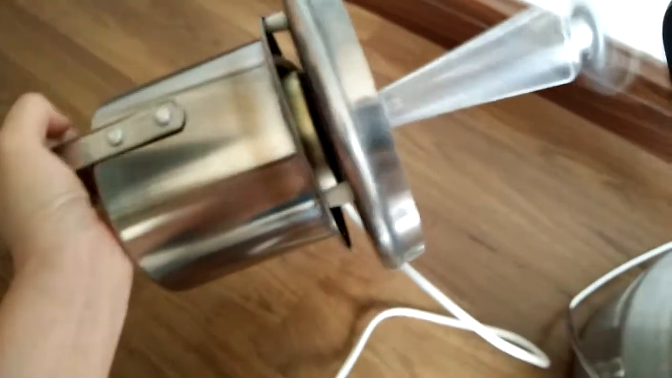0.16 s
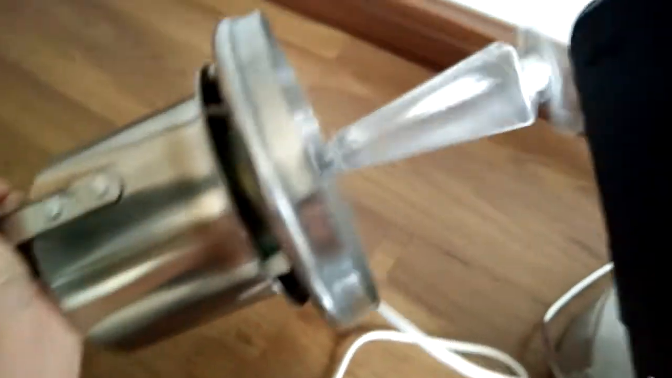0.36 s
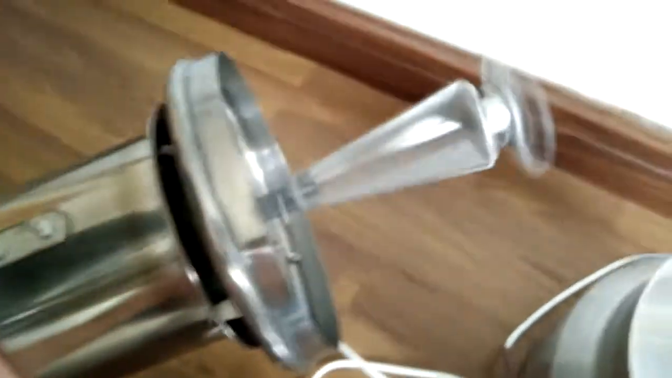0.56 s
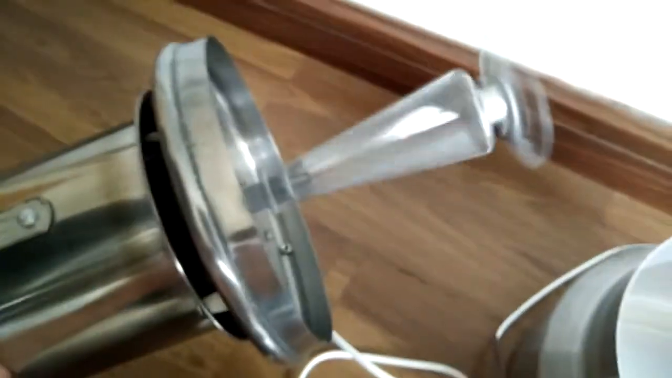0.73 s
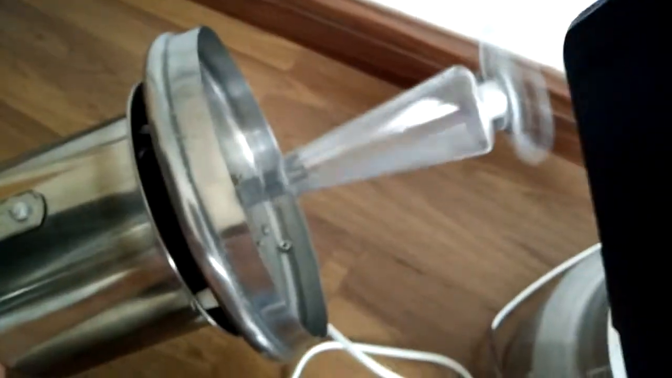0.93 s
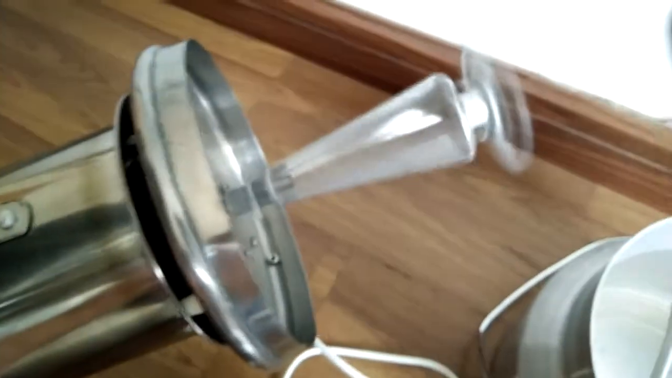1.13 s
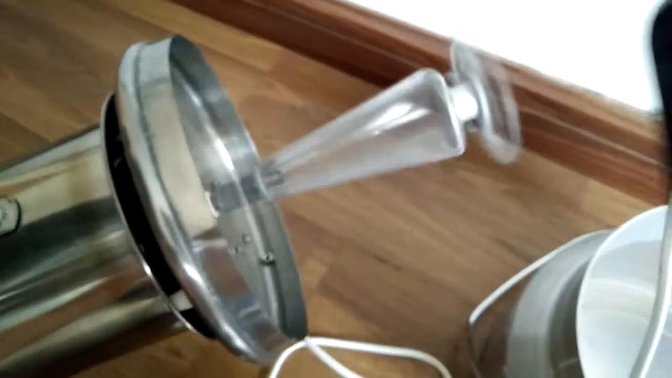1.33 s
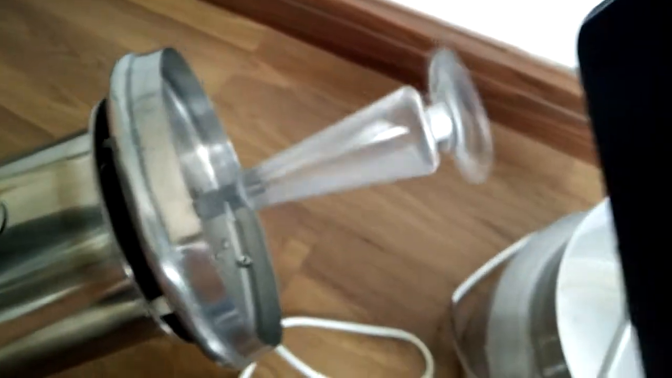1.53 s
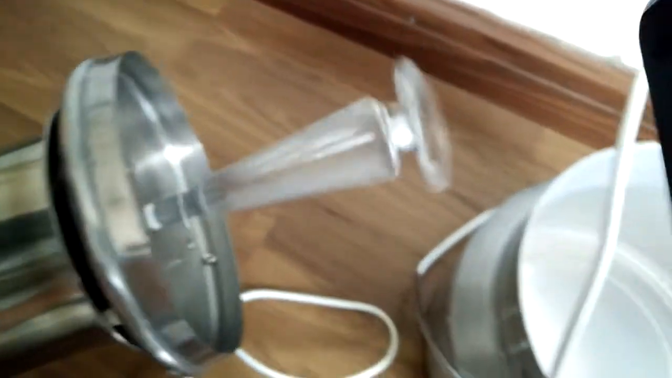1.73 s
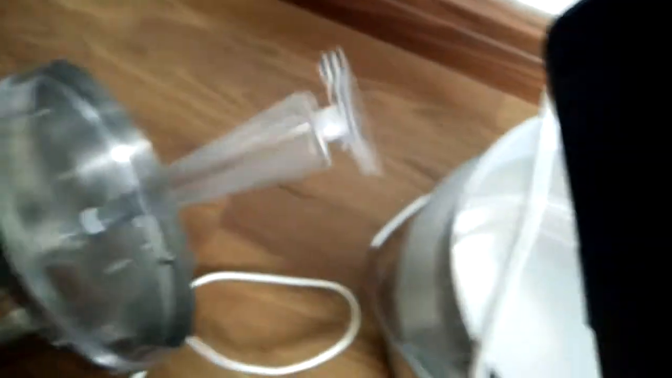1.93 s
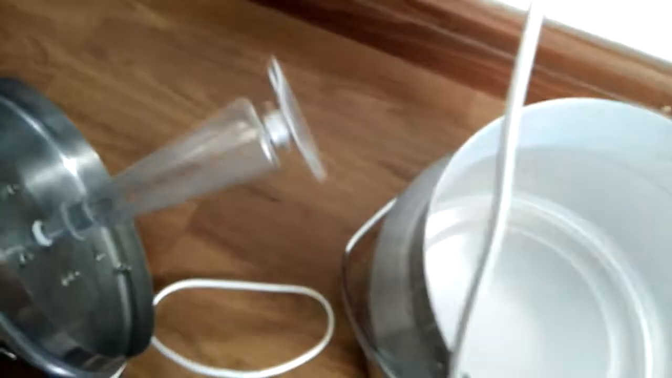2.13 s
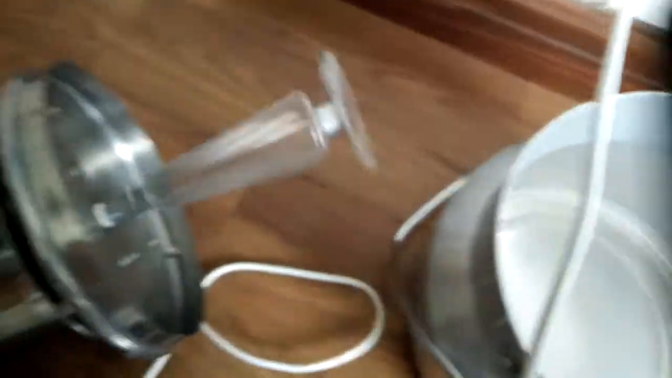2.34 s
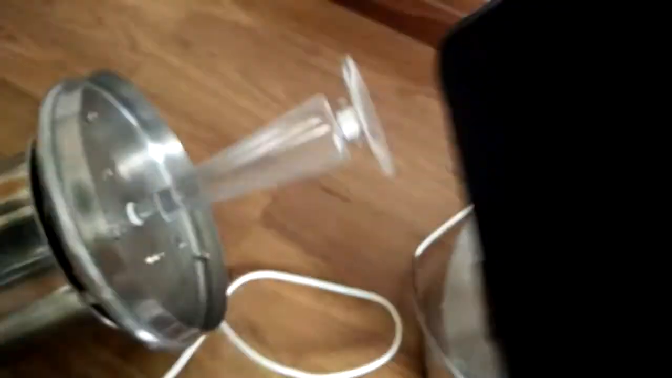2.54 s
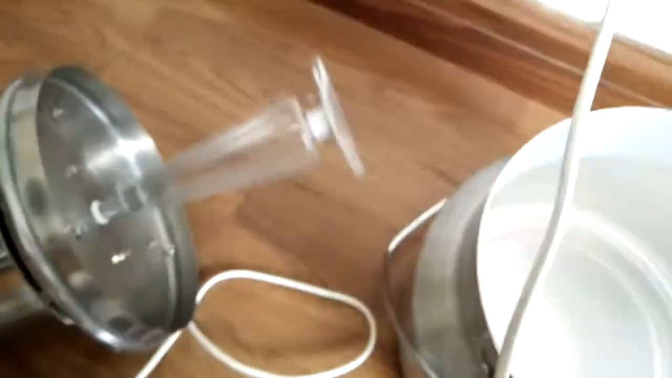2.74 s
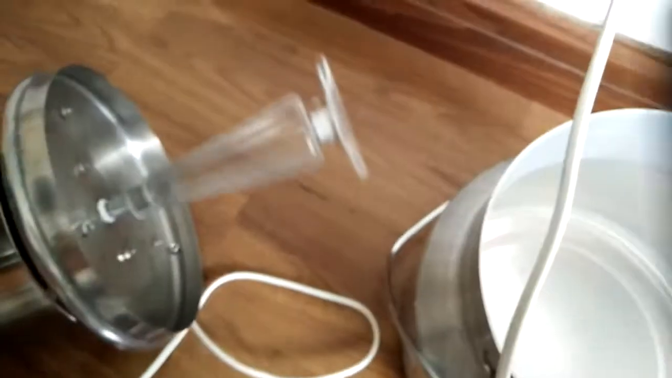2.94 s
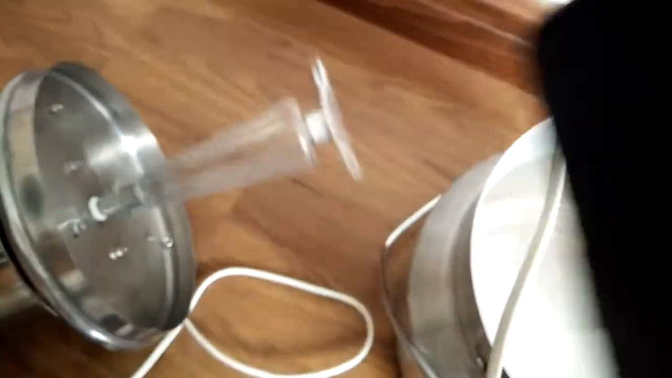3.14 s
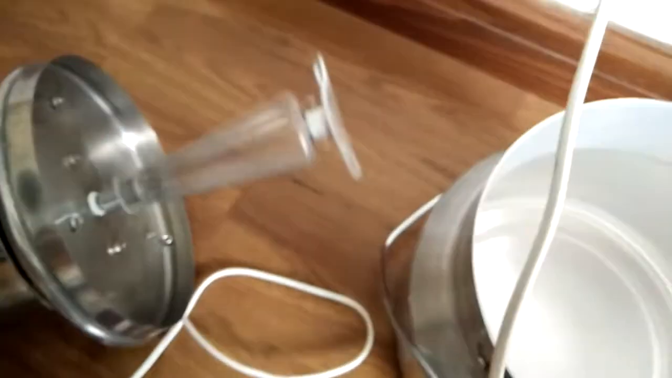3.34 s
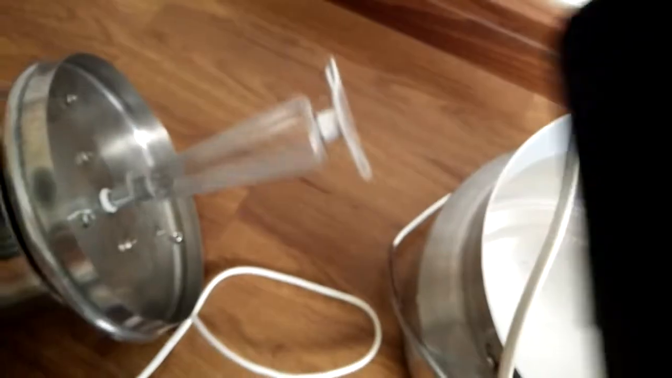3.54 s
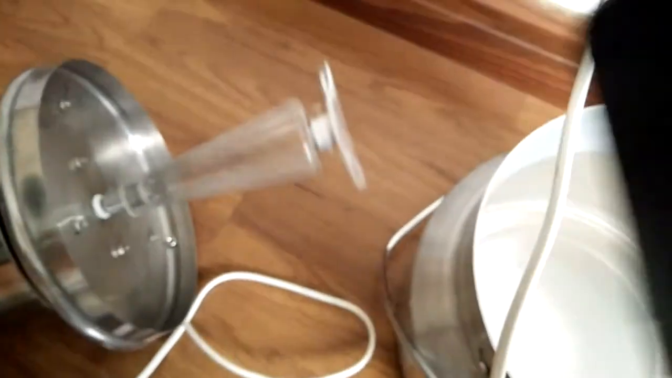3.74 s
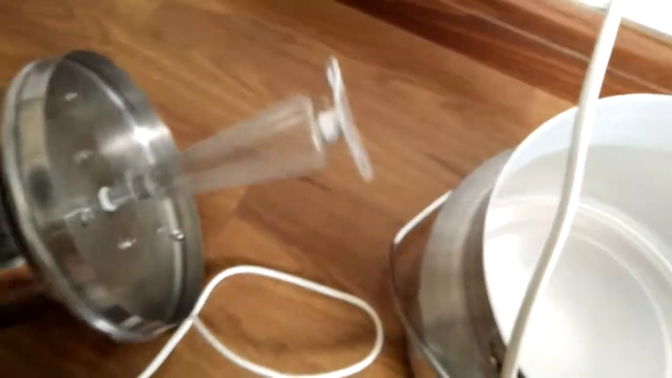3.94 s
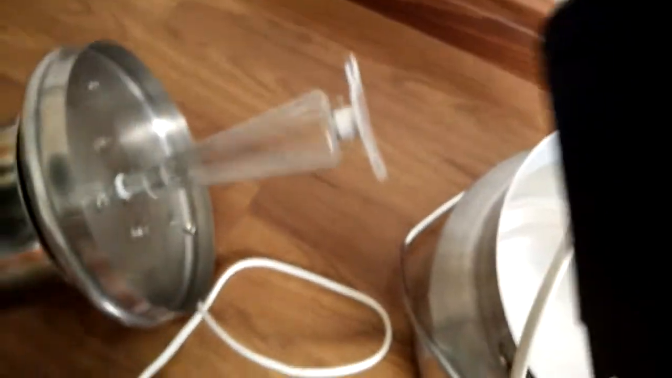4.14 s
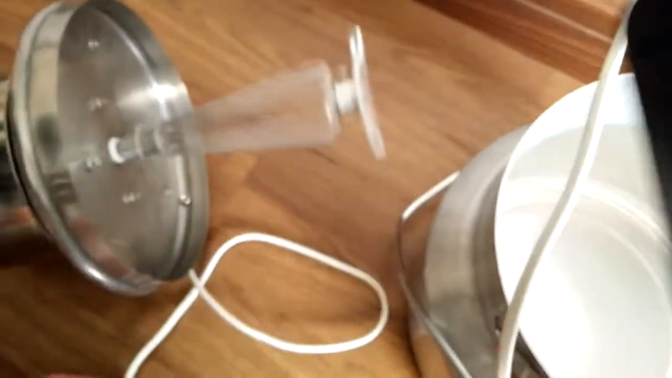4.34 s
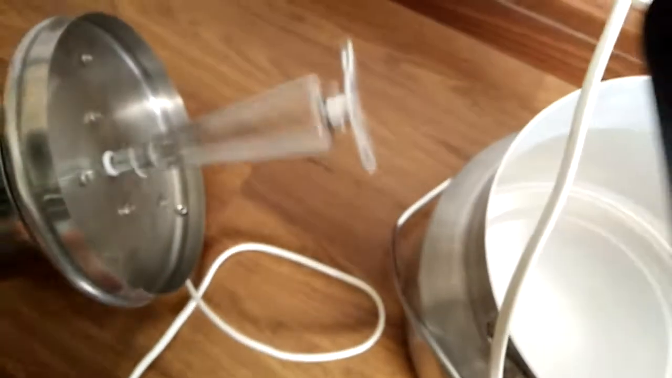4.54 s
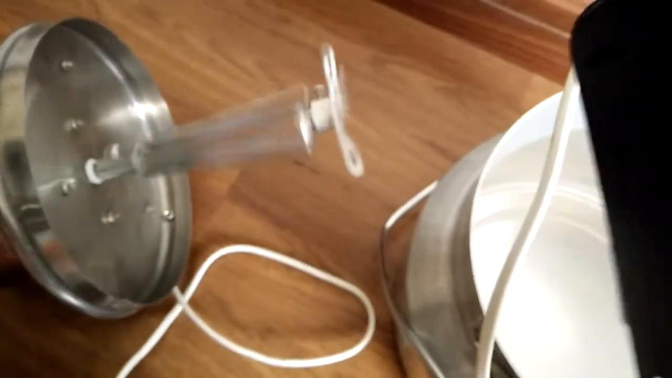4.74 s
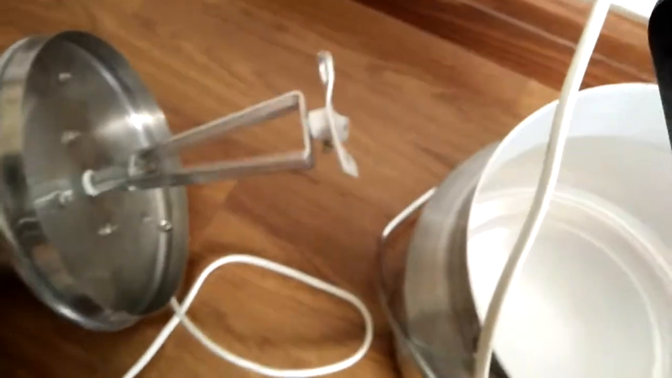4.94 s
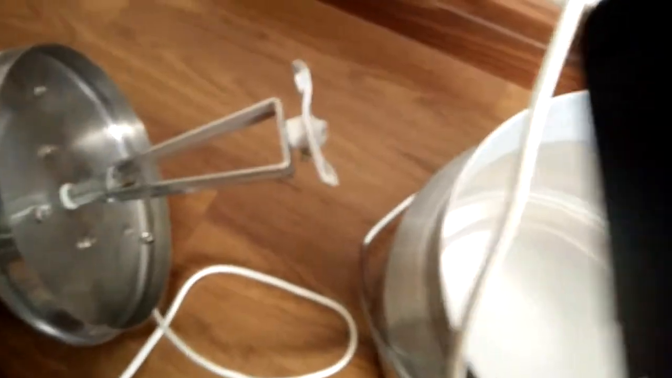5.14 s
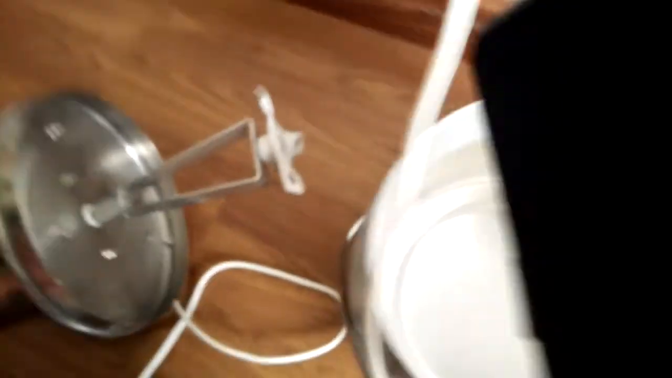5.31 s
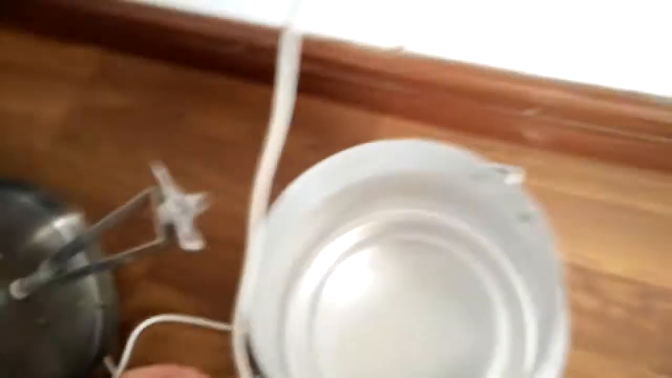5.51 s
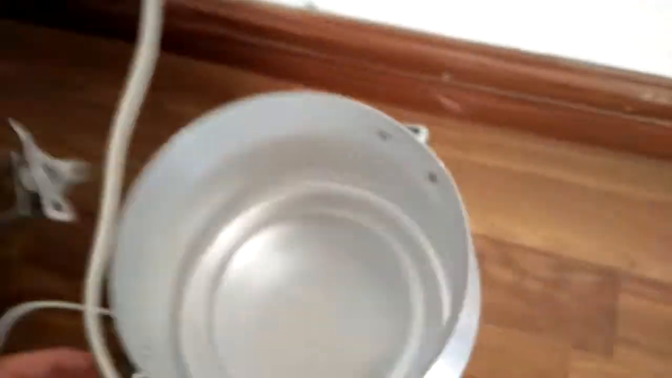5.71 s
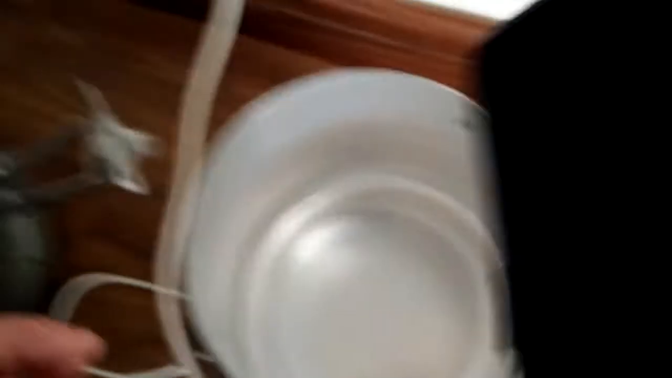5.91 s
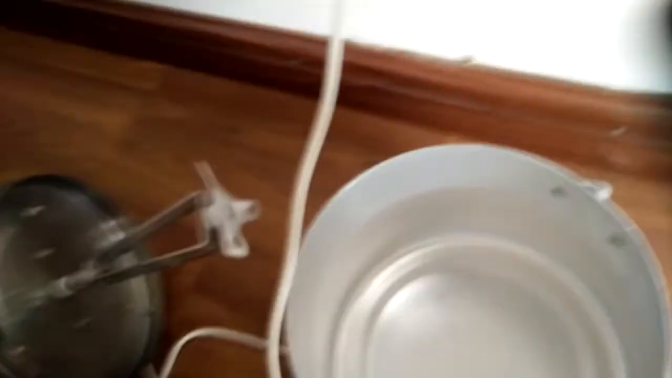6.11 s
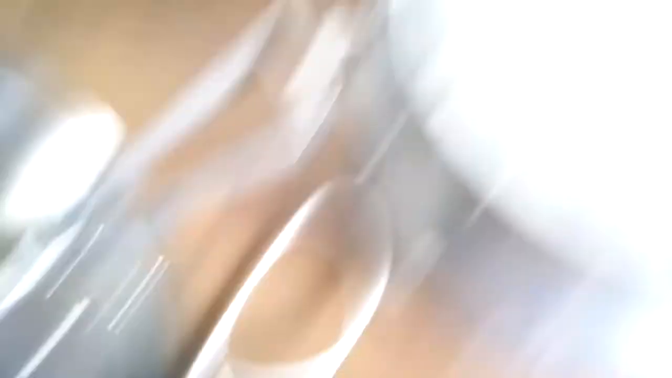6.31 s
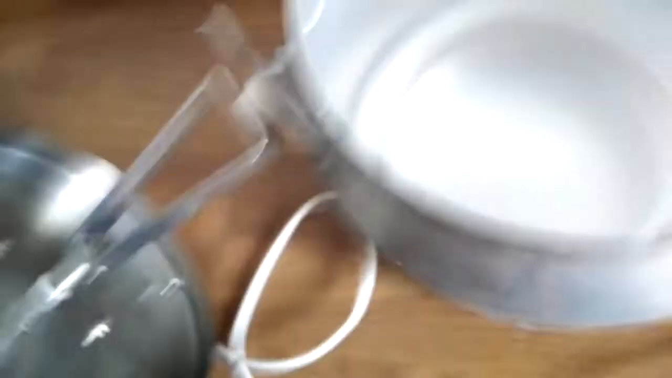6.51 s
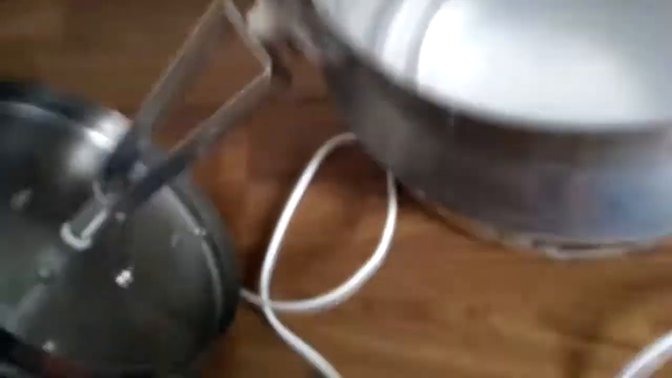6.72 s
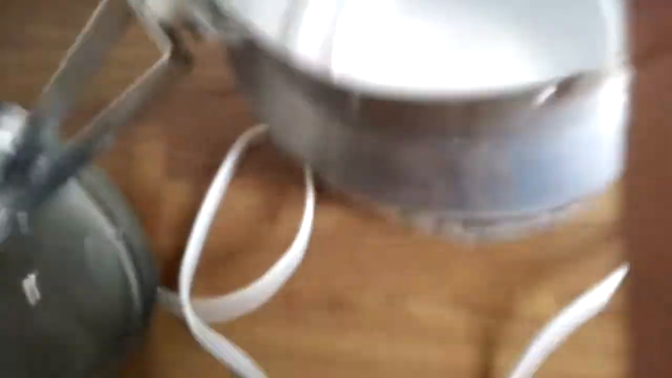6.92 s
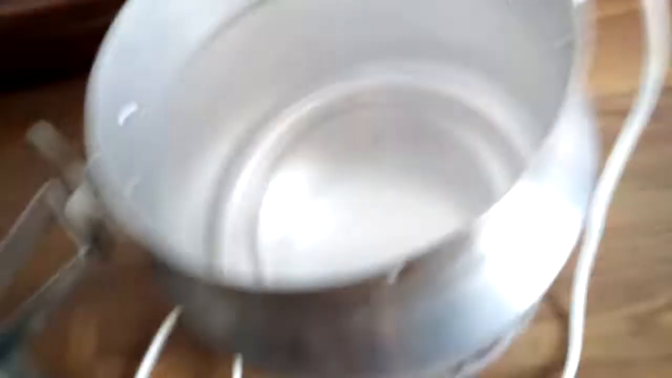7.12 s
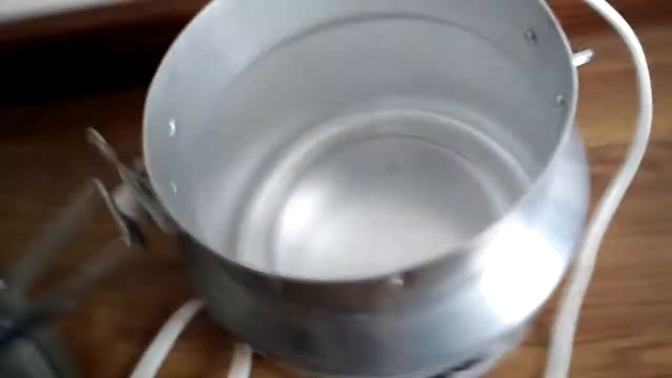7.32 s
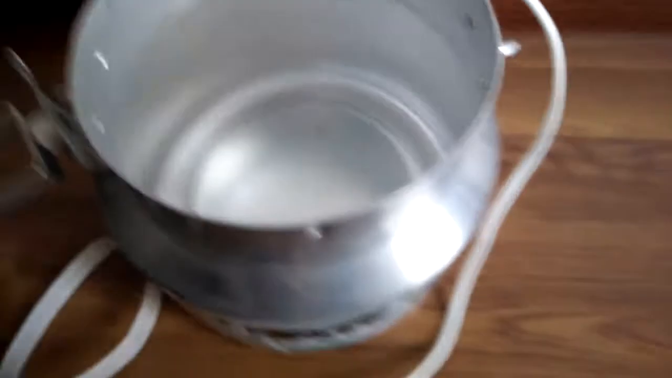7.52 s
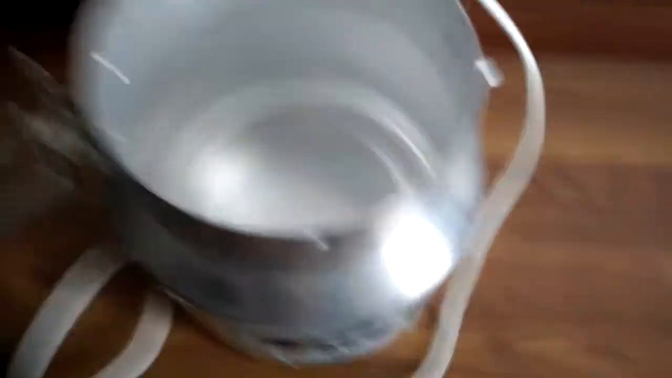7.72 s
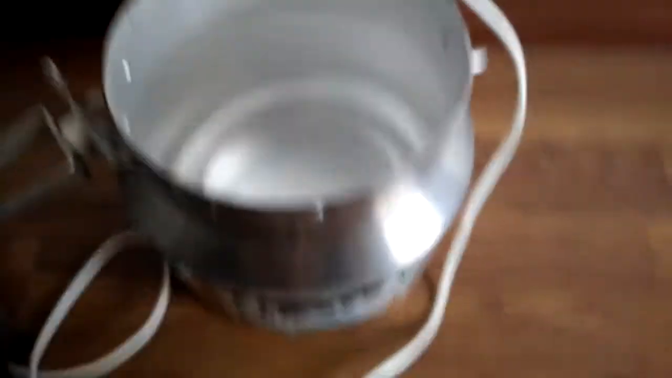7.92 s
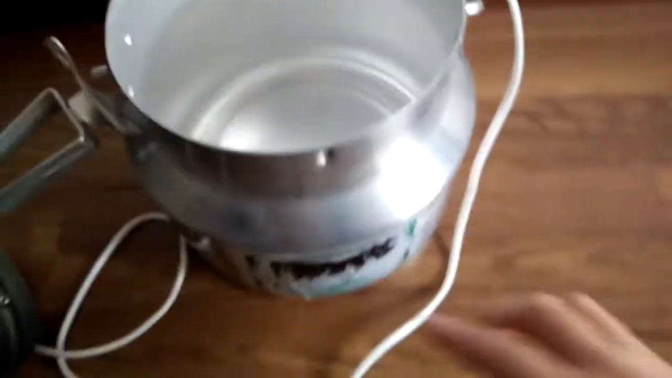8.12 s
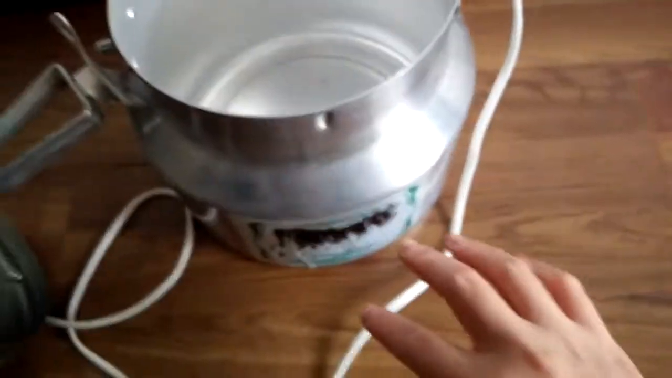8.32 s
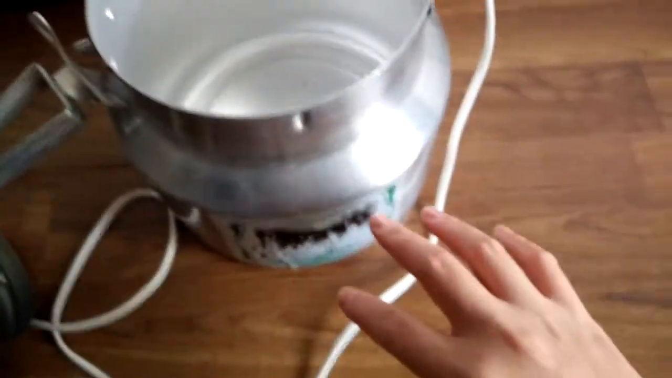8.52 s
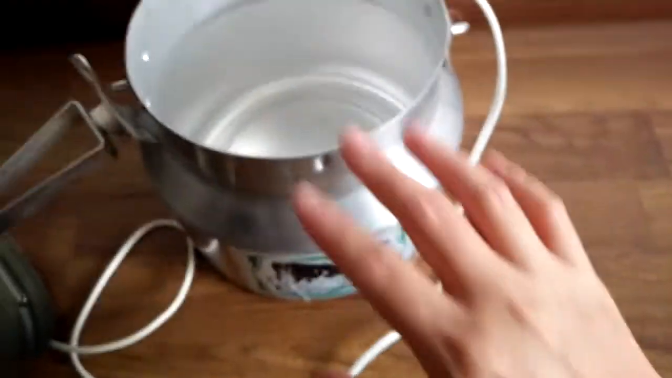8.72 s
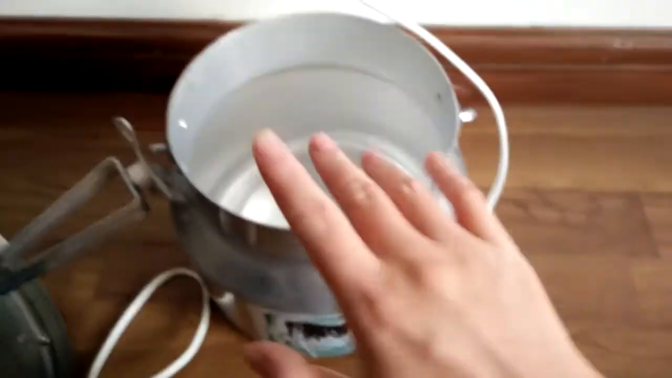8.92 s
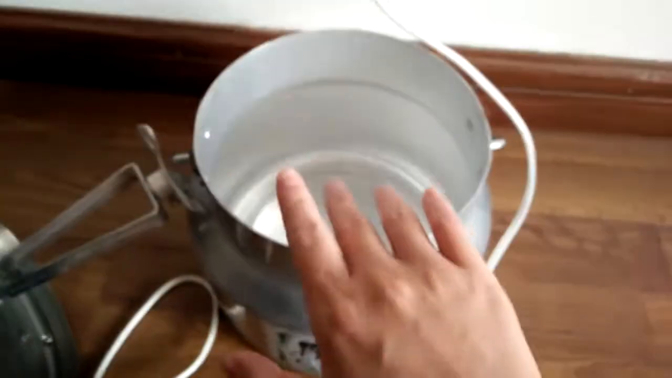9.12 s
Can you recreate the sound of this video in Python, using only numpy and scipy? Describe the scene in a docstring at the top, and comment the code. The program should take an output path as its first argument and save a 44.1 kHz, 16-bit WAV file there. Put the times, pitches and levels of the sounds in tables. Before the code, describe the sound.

From 0 s a small electric mixer is already running dry, loud and close, slightly left, in a small live room. Its loose shaft scrapes a steel lid about 23 times a second: harsh bright rasps and clattering metal over a hollow groan around 700-900 Hz and low gear rumble. The strikes shift unevenly through 2.5 s; around 2.7 s it booms and gives a brief high metallic screech. Afterwards the grinding is thinner, quieter and patchy, with loose knocks, until a sharp switch snap at 4.47 s stops it almost instantly, with a short room tail. A small tick comes at 4.9 s over faint hum and air. Soft cloth rustles from 5.4 s. From 6.3 to 7.2 s fingers scrape and bump right beside the right microphone, with a heavy thump at 6.6 s and a tiny metallic tick at 7.0 s. Lighter rubbing at 7.4-7.8 s, then near quiet.

```python
"""On the floor of a small room an electric milk mixer runs dry. Its paddle shaft whirls loose in the steel lid,
scraping the bush about 23 times a second. Noise through steel resonances makes the scrapes, sagging sines make
the lid groan between them, and the gears rumble through the housing until the switch snaps off. Mains hum, a
faint steady whine and room air lie under everything. A sleeve rustles, and fingers rub and bump the casing
beside the right microphone: filtered noise shaped by each movement."""
import sys
import numpy as np
from scipy import signal
from scipy.fft import rfft, irfft
from scipy.io import wavfile

SR = 44100
rng = np.random.default_rng(int(sys.argv[2]) if len(sys.argv) > 2 else 0)


def persist_wave(psi):
    """Save psi, clipped to +-1, as 16-bit WAV."""
    counts = np.round(np.clip(psi, -1, 1) * 32767).astype(np.int16)
    wavfile.write(sys.argv[1], SR, np.atleast_2d(counts).T)


N = 408366
TIME = np.arange(N) / SR
CUTOFF_HZ = 14350   # nothing is heard above this
STOP_S, TURN_S = 4.47, 0.0435   # the switch goes off; one turn of the shaft


def from_db(db):
    """Decibels to gain."""
    return np.exp(np.asarray(db) * np.log(10) / 20)


def rms_one(x):
    """Scale to unit power."""
    return x / np.sqrt(np.mean(x ** 2) + 1e-20)


def in_time(rows):
    """Each column of a curve, at every sample."""
    s, *columns = np.transpose(rows)
    return [np.interp(TIME, s, c) for c in columns]


def at_hz(points, hz):
    """Read a spectrum on a log-frequency axis."""
    knots, values = np.transpose(points)
    return np.interp(np.log(hz + 1), np.log(knots), values)


def causal(x, gain_at, size=4096):
    """Minimum-phase filter with the given gain against frequency."""
    cepstrum = irfft(np.log(gain_at(np.fft.rfftfreq(size, 1 / SR)) + 1e-6))
    # folding the cepstrum forward puts the energy as early as possible
    cepstrum[1:size // 2] *= 2
    cepstrum[size // 2 + 1:] = 0
    response = irfft(np.exp(rfft(cepstrum)))
    if x.ndim == 2:
        response = response[None]
    return signal.oaconvolve(x, response, axes=-1)[..., :x.shape[-1]]


def colour(x, points):
    """Give a white source a spectrum, keeping its audible power."""
    def gain_at(hz):
        gain = from_db(at_hz(points, hz))
        return gain / np.sqrt(np.mean(gain ** 2 * (hz < CUTOFF_HZ)))
    return causal(x, gain_at)


def lowpass(x, hz):
    """Take off the treble."""
    return signal.sosfilt(signal.butter(2, hz, fs=SR, output="sos"), x)


def highpass(x, hz, order=2):
    """Take off the bass."""
    return signal.sosfilt(signal.butter(order, hz, "high", fs=SR, output="sos"), x)


def band(x, low_hz, high_hz, order=2):
    """Band-pass."""
    return signal.sosfilt(signal.butter(order, [low_hz, high_hz], "band", fs=SR, output="sos"), x)


def drift(per_s):
    """Slow chance with spread 1."""
    knots = rng.standard_normal(N // 10)
    return np.interp(TIME * per_s, np.arange(len(knots)), knots) / np.sqrt(2 / 3)


def resonate(x, modes, vary_db, changes_per_s):
    """Parallel resonances; each is driven more or less as the point of contact wanders."""
    out = 0
    for hz, width, db in modes:
        r = np.exp(-np.pi * width / SR)
        drive = x * from_db(db + vary_db * drift(changes_per_s)) + 1e-18
        zeros = np.array([1, 0, -1]) * (1 - r * r) / 2
        poles = [1, -2 * r * np.cos(2 * np.pi * hz / SR), r * r]
        out = out + signal.lfilter(zeros, poles, drive)
    return out


def noise(alike):
    """White noise for two microphones; alike is the shared part of the power."""
    return np.sqrt(alike) * rng.standard_normal(N) + np.sqrt(1 - alike) * rng.standard_normal((2, N))


def friction(alike, slips_per_s, rough_db):
    """Stick and slip: noise that comes in tiny uneven spurts."""
    return rms_one(noise(alike) * from_db(rough_db * np.clip(drift(slips_per_s), -2, 2)))


def contact(s, length, attack, release, size=8192):
    """Sample range and force of one touch: quick rise, hold, dying away."""
    span = slice(int(s * SR), min(int(s * SR) + size, N))
    t = TIME[span] - TIME[span][0]
    return span, (1 - np.exp(-t / attack)) * np.exp(-np.maximum(t - length, 0) / release)


def swell(peak, rise, fall):
    """A smooth movement that grows to 1 and fades."""
    return np.exp(-np.minimum(((TIME - peak) / np.where(TIME < peak, rise, fall)) ** 2, 20))


def rings(rows, attack):
    """One dying sine for each row."""
    out = np.zeros(N)
    for s, db, hz, t60 in rows:
        span, force = contact(s, 0, attack, release=t60 / np.log(1000), size=16384)
        out[span] += from_db(db) * force * np.sin(2 * np.pi * hz * (TIME[span] - s))
    return out


def motor_on(fade_s):
    """One while the motor runs, dying away after the switch."""
    return np.exp(-np.maximum(TIME - STOP_S, 0) / fade_s)


def each_turn(runs):
    """Repeat each run once per turn of the shaft: rows of (s, the run's other columns)."""
    return np.array([(s, *rest) for first, until, *rest in runs for s in np.arange(first, until, TURN_S)])


def lower_rings(count=7):
    """Friction below the hiss, in bands that flare and fade separately as the point of contact wanders."""
    patchy_db = 5
    sources = [friction(alike=0.28, slips_per_s=840, rough_db=2.5) for _ in range(2)]
    edges = np.geomspace(1100, 5800, count)
    out = 0
    for k, (low, high) in enumerate(zip(edges, edges[1:])):
        out = out + band(sources[k % 2], low, high) * from_db(patchy_db * np.clip(drift(70), -2, 2))
    return out


# How hard the shaft bears on the bush. Each row: time in seconds, grinding in dB before its trim,
# lower rings relative to the grinding in dB before their trim.
BEARING = [(0.0, -21, -5), (0.01, -17.5, -15.5), (0.35, -20, -24.5), (0.56, -28.5, -17),
           (0.99, -21.5, -18.5), (1.37, -28.5, -14), (1.42, -20.5, -18), (2.0, -24, -7), (2.4, -21, -17.5),
           (2.74, -15.5, -8.5), (2.77, -30.5, -7.5), (3.12, -33.5, -16.5), (3.14, -22.5, -14),
           (3.53, -27, -16.5), (3.578, -39, -30), (3.6, -26.5, -9), (3.81, -30, -11), (3.89, -38, -15),
           (3.95, -45.5, -6), (4.01, -37.5, 0), (4.04, -42, -26), (4.05, -31, -13), (4.3, -27.5, -15),
           (4.46, -35, -27)]
# Scrapes once a turn, until the shaft shifts in the bush. Each row: first scrape in seconds, end in seconds,
# dB over the untrimmed bearing curve, hold in seconds, frame clatter in dB.
SCRAPE_RUNS = [(0.01, 0.32, 9.5, 0.0049, -34), (0.033, .3, 8, 0.011, -34), (0.469, .58, 10.5, 0.0057, -30),
               (0.6005, 1.32, 8, 0.0094, -27), (0.623, 1.8, 1.5, 0.0092, -55.5),
               (1.384, 2.2, 4, 0.009, -29), (2.159, 2.37, 5, 0.0077, -42.5),
               (2.209, 2.49, 4.5, 0.013, -36.5), (2.512, 2.66, 4, 0.0061, -25),
               (2.868, 3.06, 8.5, 0.0051, -46), (3.425, 3.49, -3, 0.015, -51),
               (3.587, 3.89, 4, 0.0078, -63), (3.702, 3.85, 10, 0.0067, -44), (4.027, 4.48, 9, 0.012, -42)]
# Single strikes of the shaft. Each row: start in seconds, level in dB, hold in seconds, frame clatter in dB.
STRIKES = [(0.229, -7, 0.0057, -34.5), (0.339, -7, 0.004, -30), (0.357, -9, 0.0095, -30.5),
           (0.393, -5, 0.0035, -43), (0.469, -17, 0.0097, -24.5), (0.6005, -23.5, 0.0027, -25.5),
           (0.623, -14, 0.0031, -44), (0.6468, -22.5, 0.0027, -19.5), (0.688, -12, .004, -27.5),
           (0.7322, -27, 0.0037, -26.5), (0.7745, -11, 0.0034, -16), (0.817, -14, 0.0056, -21.5),
           (0.8616, -9.5, 0.0055, -25.5), (0.905, -10.5, 0.0033, -42.5), (1.0354, -11, 0.012, -25.5),
           (1.122, -12, 0.0035, -34), (1.165, -14.5, 0.0067, -34), (1.297, -21, 0.0033, -31),
           (1.329, -15, 0.0052, -48), (1.387, -10.5, 0.0035, -20), (1.4262, -7.5, 0.0016, -48),
           (1.4731, -11.5, 0.0064, -24.5), (1.6, -9, 0.0035, -30), (1.6447, -12.5, 0.0033, -29.5),
           (1.689, -15.5, 0.0057, -22.5), (1.7774, -10, 0.0026, -21.5), (1.8642, -11, 0.0026, -25.5),
           (1.9495, -16.5, 0.0077, -19), (2.038, -15, 0.0063, -19), (2.083, -20.5, 0.0049, -16.5),
           (2.126, -12, 0.0029, -36), (2.169, -20, 0.0056, -21), (2.291, -6.5, 0.002, -33.5),
           (2.381, -10, 0.0032, -30), (2.42, -11, 0.008, -43.5), (2.464, -12.5, 0.0053, -36),
           (2.512, -10, 0.007, -27), (2.598, -8.5, 0.0057, -23), (2.657, -15, 0.0091, -21.5),
           (2.6944, -8, 0.0051, -27.5), (2.744, -16.5, 0.0018, -27.5), (3.0, -18.5, 0.0023, -30.5),
           (3.143, -20.5, 0.0026, -48.5), (3.263, -20, 0.0061, -29.5), (3.327, -18.5, 0.0032, -34),
           (3.47, -17, .003, -34), (3.521, -17.5, 0.02, -33.5), (3.588, -18, 0.0027, -57),
           (4.029, -19.5, 0.012, -30), (4.157, -22, 0.006, -45.5), (4.316, -13.5, 0.0018, -42.5),
           (4.36, -22, 0.0045, -40.5)]
# Tone of the scraping. Each row: frequency in Hz, relative level in dB.
SCRAPE_COLOUR = [(600, -43), (1300, -19.5), (1650, -11), (2200, -14.5), (2500, -2), (2800, -7), (3150, -7),
                 (4100, -15), (4700, -6), (5720, -1), (8460, -2), (11200, 4.5), (14000, -5)]
# Ringing of the steel lid. Each row: frequency in Hz, width in Hz, relative level in dB.
STEEL = [(3030, 130, -6), (3230, 140, -6), (4850, 70, -6), (5110, 90, -7), (5860, 160, -2), (6750, 90, -4),
         (7085, 150, -4), (8950, 170, -6), (9630, 140, -3), (10150, 260, -3), (10880, 150, 0),
         (11490, 170, 0), (12685, 100, -2)]
# Clatter of the paddle frame. Each row: frequency in Hz, width in Hz, relative level in dB.
FRAME = [(1247, 96, -1.5), (1550, 90, -9.5), (1883, 140, -6.5), (2040, 77, -4.5), (2348, 76, -3),
         (3140, 76, 6), (3270, 340, 3), (3582, 220, -3.5), (4420, 490, -1.5), (4970, 160, 1)]
GRIND_TRIM_DB, LOWER_RINGS_TRIM_DB = 1.5, 6   # added to the bearing curve
GRIND_FLUTTER_DB = 2.8
LIGHT_TOUCH_DB = -3   # grinding wakes the lower rings less than a scrape does
SCRAPE_SPREAD_DB, SCRAPE_JITTER_S = 1.54, 0.0011   # from turn to turn
LIFT_DB, LIFT_S = -5.5, 0.0056   # the shaft lifts clear of the bush just before it strikes


def shaft():
    """Hard scrapes over steady grinding set the steel lid ringing; each stroke makes the paddle frame clatter."""
    bearing_db, lower_db = in_time(BEARING)
    grind = from_db(bearing_db + GRIND_TRIM_DB + GRIND_FLUTTER_DB * drift(60)) * motor_on(fade_s=0.011)
    turns = each_turn(SCRAPE_RUNS)
    strokes = list(STRIKES)
    for (s, db, length, clatter_db), (late, harder, louder) in zip(turns, rng.standard_normal((len(turns), 3))):
        level_db = bearing_db[int(s * SR)] + db + SCRAPE_SPREAD_DB * harder
        strokes.append((s + SCRAPE_JITTER_S * late, level_db, length, clatter_db + SCRAPE_SPREAD_DB * louder))
    scrape, knock = np.zeros((2, N))
    for s, db, length, clatter_db in strokes:
        span, force = contact(s, length, attack=0.0003, release=0.0083)
        scrape[span] = np.maximum(scrape[span], from_db(db) * force)
        span, force = contact(s, length, attack=0.00035, release=0.0054)
        knock[span] = np.maximum(knock[span], from_db(clatter_db) * force)
        before = slice(max(span.start - 1024, 0), span.start)
        grind[before] *= from_db(LIFT_DB * np.exp((TIME[before] - s) / LIFT_S))
    # all lower rings chatter together, alike in both microphones, as the shaft shifts in the bush
    chatter_db = 1.5 * np.tanh(drift(90))
    low = lower_rings() * from_db(lower_db + LOWER_RINGS_TRIM_DB + chatter_db)
    high = highpass(friction(alike=0.25, slips_per_s=910, rough_db=1.5), 5800, order=3)
    rubbing = np.maximum(grind * from_db(LIGHT_TOUCH_DB), scrape) * low + np.maximum(grind, scrape) * high
    clatter = knock * rms_one(resonate(noise(alike=0.5), FRAME, vary_db=8, changes_per_s=23))
    hiss = from_db(-3.5) * colour(rubbing, SCRAPE_COLOUR)
    ringing = from_db(-3) * resonate(rubbing, STEEL, vary_db=3.0, changes_per_s=50)
    return clatter + hiss + ringing


# Growl of the lid. Each row: time in seconds, level in dB before its trim.
GROWL = [(0.0, -30.5), (0.07, -31.5), (0.45, -34), (0.65, -32), (1.05, -34), (1.25, -34), (1.5, -29.5),
         (2.05, -39), (2.21, -35.5), (2.72, -33), (2.77, -68), (3.13, -57.5), (3.15, -40), (3.33, -37.5),
         (3.55, -45), (4.01, -51.5), (4.02, -53.5), (4.43, -49), (4.46, -69)]
# The shaft judders in the lid once a turn. Each row: middle of the first swell in seconds, end in seconds,
# level in dB, pitch in Hz.
JUDDER_RUNS = [(0.04, .41, -31, 810), (0.474, .8, -22.5, 935), (0.499, .83, -25.5, 732),
               (0.889, .91, -15, 712), (0.932, .95, -25, 753), (0.978, 1.04, -15, 725),
               (1.065, 1.17, -21, 721), (1.195, 1.26, -33.5, 730), (1.283, 1.3, -17.5, 733),
               (1.345, 1.71, -21, 920), (1.41, 1.6, -23, 738), (1.762, 2.0, -24.5, 707),
               (2.023, 2.16, -36.5, 686), (2.197, 2.39, -22, 705), (2.479, 2.57, -24, 710)]
# Loose knocks of the lid. Each row: start in seconds, level in dB.
LID_KNOCKS = [(2.968, -27.5), (3.14, -27.5), (3.276, -30.5), (3.405, -33), (3.523, -38), (3.684, -35),
              (3.714, -28), (3.799, -21), (4.019, -29.5), (4.07, -32.5), (4.121, -33.5), (4.24, -31.5),
              (4.326, -34.5), (4.371, -33.5), (4.645, -50.5)]
# Drum modes of the lid. Each row: frequency in Hz, width in Hz, relative level in dB.
LID = [(603, 12, -7), (722.7, 17, 9.5), (820, 98, 2.5), (925, 94, -1), (1050, 61, -25)]
GROWL_TRIM_DB = -1.5   # added to the growl curve
JUDDER_SPREAD_DB, JUDDER_PITCH_SPREAD = 0.8, 0.0089   # from turn to turn; pitch as a fraction


def lid():
    """Each judder is a gritty swell that sags in pitch; grinding keeps the drum modes growling."""
    growl_db, = in_time(GROWL)
    swells, push = np.zeros((2, N))
    turns = each_turn(JUDDER_RUNS)
    for (s, run_db, run_hz), (harder, higher, phase) in zip(turns, rng.standard_normal((len(turns), 3))):
        db = run_db + JUDDER_SPREAD_DB * harder
        hz = run_hz * (1 + JUDDER_PITCH_SPREAD * higher)
        span = slice(max(int((s - .04) * SR), 0), int((s + .04) * SR))
        t = TIME[span] - s
        width = 0.0062 * (LID[1][0] / hz) ** 3.4   # the lower the pitch, the longer the swell
        sagging = np.sin(2 * np.pi * (hz * (t - 1.3 * t * t) + phase))
        swells[span] += from_db(db) / np.cosh(t / width * 1.4) * sagging
        # the grit comes as the shaft grips, just before the swell peaks
        push[span] += from_db(db - 14.5) / np.cosh((t + 0.0046) / 0.00077)
    swells *= from_db(0.595 * drift(500))
    push += from_db(growl_db + GROWL_TRIM_DB) * motor_on(fade_s=.04)
    for s, db in LID_KNOCKS:
        span, force = contact(s, 0.0073, attack=0.0065, release=0.0075)
        push[span] += from_db(db) * force
    grit = friction(alike=0.85, slips_per_s=150, rough_db=8.0)
    growl = rms_one(band(resonate(grit, LID, vary_db=3.0, changes_per_s=30), 633, 1126, order=4))
    return swells + push * growl


# Rumble of the gears. Each row: time in seconds, level in dB before a 2 dB lift.
GEARS = [(0.0, -49), (0.12, -46.5), (0.26, -52), (0.38, -47.5), (0.63, -58.5), (0.86, -49), (1.6, -51.5),
         (1.64, -45), (2.45, -48), (2.7, -36.5), (3.13, -52.5), (3.3, -43.5), (3.74, -45.5), (3.84, -47.5),
         (3.85, -42.5), (3.96, -56), (4.09, -40), (4.46, -47)]
# Tone of the rumble. Each row: frequency in Hz, relative level in dB.
BODY_COLOUR = [(70, -29), (150, -4.5), (200, -4.5), (255, -3.5), (310, 5), (370, -5.5), (460, -10),
               (620, 2), (1000, -11), (1300, -25.5), (1700, -13), (3000, -33)]
# The shaft jolts the housing, hardest as it whirls widest; so does the switch.
# Each row: start in seconds, level in dB, hold in seconds.
JOLTS = [(2.556, -34.5, 0.0087), (2.605, -28, 0.026), (2.652, -27, 0.015), (2.691, -22.5, 0.013),
         (2.736, -37.5, 0.011), (3.42, -35, 0.01), (3.599, -47, 0.008), (3.641, -41.5, 0.0069),
         (3.848, -41, 0.011), (4.061, -40.5, .01), (4.164, -37.5, 0.0071), (4.215, -39.5, 0.0085),
         (4.418, -41.5, 0.0073), (4.47, -29.5, 0.0023)]
# Resonances of the motor housing. Each row: frequency in Hz, width in Hz, relative level in dB.
HOUSING = [(175, 57, -23.5), (255, 35, 3), (282, 49, -1.5), (375, 110, 1.5), (462, 6.5, 8.5), (548, 89, 6),
           (740, 110, -1), (1040, 230, -7.5), (1480, 330, -15)]


def motor():
    """The gears rumble through the housing, and jolts make it boom."""
    rumble = colour(friction(alike=0.94, slips_per_s=89, rough_db=2.0), BODY_COLOUR)
    gears = from_db(in_time(GEARS)[0] + 2.0) * rumble * motor_on(fade_s=0.021)
    jolt = np.zeros(N)
    for s, db, length in JOLTS:
        span, force = contact(s, length, attack=.001, release=0.0075)
        jolt[span] += from_db(db) * force
    boom = rms_one(resonate(noise(alike=0.83), HOUSING, vary_db=7.0, changes_per_s=23))
    return gears + jolt * boom


# Steady tones: mains hum near 50 and 100 Hz, and a faint whine at 689 Hz.
# Each row: frequency in Hz, level in dB.
STEADY_TONES = [(49.7, -67), (100.1, -50), (689, -81.5)]
# Tone of the room air. Each row: frequency in Hz, relative level in dB.
ROOM_TONE = [(90, -10.5), (170, 6), (260, -2), (400, -5.5), (700, -12.5), (1100, -20), (1700, -22),
             (3000, -26.5), (5000, -34), (14000, -34.5)]
# Tone of the low rumble. Each row: frequency in Hz, relative level in dB.
RUMBLE_COLOUR = [(20, -15.5), (50, 3), (80, 3.5), (140, 4.5), (250, -29.5)]


def background():
    """Hum and whine as sines wavering gently in level, the air of the room and a low rumble as coloured noise."""
    tones = sum(from_db(db) * np.sqrt(2) * np.sin(2 * np.pi * hz * TIME) for hz, db in STEADY_TONES)
    tones = tones * from_db(1.5 * drift(0.94))
    air = from_db(-61) * colour(noise(alike=0.45), ROOM_TONE)
    rumble = from_db(-63) * colour(noise(alike=0.23), RUMBLE_COLOUR)
    return tones + air + rumble


# One screech as the shaft whirls widest: peak in seconds, rise in seconds, fall in seconds, level in dB.
SCREECH = (2.71, .045, .03, -23)
# The singing steel. Each row: frequency in Hz, width in Hz, relative level in dB.
SCREECH_MODES = [(5110, 73, -6.5), (5550, 90, -0.5), (5820, 110, 4), (6265, 180, 0.5)]


def screech():
    """The shaft binds for a moment and the steel sings."""
    peak, rise, fall, db = SCREECH
    singing = rms_one(resonate(noise(alike=0.56), SCREECH_MODES, vary_db=4.5, changes_per_s=40))
    return from_db(db) * swell(peak, rise, fall) * singing


def with_tail(force, wet_db, t60):
    """Add the smooth diffuse decay of the room to the envelope of a noise burst."""
    keep = from_db(-120 / (t60 * SR))   # decay of power per sample
    tail = signal.lfilter([1 - keep], [1, -keep], force ** 2 + 1e-18)
    return np.sqrt(force ** 2 + from_db(wet_db) ** 2 * tail)


# The switch and light ticks. Each row: start in seconds, level in dB, dry decay by 60 dB in seconds,
# share of the power in the treble tick from 0 to 1.
CLICKS = [(4.4697, -7, 0.017, 0.55), (4.86, -44, 0.11, 0.98), (5.886, -56, 0.02, 0.2),
          (6.991, -43.5, 0.019, 0.64), (4.99, -63, 0.042, 0.3), (7.762, -55.5, 0.038, 0.63),
          (8.0206, -56.5, 0.035, .95), (8.487, -60, 0.034, 0.8)]
# Tone of the snap. Each row: frequency in Hz, relative level in dB.
SWITCH_COLOUR = [(200, -14), (700, -10.5), (1400, -5.5), (2000, -21.5), (2500, -2), (2950, 10.5),
                 (3800, 0.5), (4700, -1), (5600, 6.5), (6900, 6), (8200, -5.5), (14000, -16.5)]
# Tone of the treble tick. Each row: frequency in Hz, relative level in dB.
TICK_COLOUR = [(2000, -36.5), (6000, -12.5), (10000, 4.5), (14000, 3.5)]


def clicks():
    """The switch snaps and smaller parts tick as they settle: short noise bursts with a room tail."""
    snap, tick = np.zeros((2, N))
    for s, db, t60, treble in CLICKS:
        span, force = contact(s, 0.0022, attack=.0002, release=t60 / np.log(1000))
        snap[span] += from_db(db) * force * np.sqrt(1 - treble)
        tick[span] += from_db(db) * force * np.sqrt(treble)
    snap = with_tail(snap, wet_db=-5.0, t60=.48)
    tick = with_tail(tick, wet_db=-8.5, t60=0.37)
    return colour(snap * noise(alike=0.2), SWITCH_COLOUR) + colour(tick * noise(alike=0.23), TICK_COLOUR)


# The arm moving nearby. Each row: peak in seconds, rise in seconds, fall in seconds, rustle in dB.
ARM_MOVES = [(5.4, .07, 0.078, -65), (5.72, 0.3, 0.68, -58), (6.48, 0.072, 0.33, -45.5),
             (7.6, 0.34, 0.23, -63.5), (8.4, 0.13, 0.24, -71.5), (8.93, 0.11, 0.35, -67)]
# Tone of the cloth. Each row: frequency in Hz, relative level in dB.
SLEEVE_COLOUR = [(100, -4), (190, 5), (450, -3), (800, -9.5), (1600, -23), (3000, -21.5), (4200, -32),
                 (6200, -21.5), (8000, -25), (12000, -23)]


def sleeve():
    """Cloth rustles faintly in uneven puffs."""
    rustle = colour(friction(alike=0.37, slips_per_s=57, rough_db=2.0), SLEEVE_COLOUR)
    return rustle * sum(from_db(db) * swell(peak, rise, fall) for peak, rise, fall, db in ARM_MOVES)


# Small metal parts touching. Each row: start in seconds, level in dB, pitch in Hz, decay by 60 dB in seconds.
PINGS = [(5.886, -47, 1610, 0.022), (6.993, -42, 3350, 0.015)]


def pings():
    """Small metal parts ring as dying sines, alike in both microphones."""
    return np.tile(rings(PINGS, attack=0.0004), (2, 1))


# Fingers sliding on the casing. Each row: peak in seconds, rise in seconds, fall in seconds,
# light hiss in dB, pressed rasp in dB (both before their trims), pitch of the rasp in Hz,
# its glide in octaves per second.
STROKES = [(6.32, 0.086, 0.14, -47, -64, 1500, 1), (6.335, 0.02, 0.013, -50, -49.5, 5160, -3),
           (6.41, .02, 0.03, -49, -44, 4000, -4), (6.471, 0.066, 0.094, -38, -45, 1360, -0.5),
           (6.515, 0.024, .014, -34, -39, 3420, -0.5), (6.59, 0.033, 0.017, -31.5, -47, 1940, 2),
           (6.722, 0.0044, 0.019, -41, -41.5, 2160, 1.5), (6.8, 0.055, 0.073, -34, -49, 2810, -3.5),
           (7.073, 0.012, 0.013, -37, -47.5, 2320, 0), (7.17, 0.16, 0.087, -49, -62, 2000, -1),
           (7.483, 0.059, 0.033, -32.5, -37.5, 1900, -3.5), (7.584, 0.057, 0.0087, -49, -42, 1626, 5.5),
           (7.669, 0.1, 0.022, -45, -49, 2770, 7.5), (7.69, 0.07, 0.029, -54.5, -46.5, 1810, 0),
           (7.84, 0.023, 0.031, -54, -63.5, 2600, 3), (8.36, 0.052, 0.094, -74, -86.5, 2004, 0.5)]
# Tone of the light hiss. Each row: frequency in Hz, relative level in dB.
HISS_COLOUR = [(1200, -27), (2300, -19), (3100, -18), (4500, -5), (6200, -2.5), (7000, -2), (8000, -6.5),
               (10000, 1), (14000, -5.5)]
# Tone of the pressed rasp. Each row: frequency in Hz, relative level in dB.
RASP_COLOUR = [(150, -2), (650, -10.5), (850, 3), (1200, -4.5), (1500, -1), (1950, 1.5), (2500, -5.5),
               (3100, -18), (4500, -19.5)]
# The gap between finger and casing. Each row: frequency in Hz, width in Hz, relative level in dB.
FINGER_GAP = [(1500, 290, -16), (2040, 59, -14.5), (4040, 680, -4), (4930, 460, -11), (6300, 900, -7)]
# A moving resonance of that gap. Each row: time in seconds, frequency in Hz.
GAP_PITCH = [(6.25, 6800), (6.48, 6300), (6.58, 5550), (6.72, 5300), (6.75, 6800), (6.86, 5750),
             (7.08, 6400), (7.43, 5900), (7.65, 6250), (7.71, 5600)]
# Fingers bumping the casing. Each row: start in seconds, level in dB before the side gains,
# nominal length in seconds (0.67 of it is held), corner in Hz above which it is dull.
BUMPS = [(6.294, -40, 0.035, 503), (6.359, -42.5, 0.032, 494), (6.386, -50, .004, 1500),
         (6.407, -35.5, 0.0061, 900), (6.552, -27, 0.0023, 1160), (6.593, -34, 0.0036, 670),
         (6.599, -13, 0.019, 3740), (6.668, -28, 0.046, 1110), (6.711, -31.5, 0.0043, 1790),
         (6.861, -33, 0.022, 537), (7.59, -41, 0.0074, 162)]
# Tone of the bumps. Each row: frequency in Hz, relative level in dB.
BUMP_COLOUR = [(30, -21.5), (55, -7.5), (150, 1.5), (300, -2.5), (750, -7), (2000, -7.5), (3200, -9),
               (7000, -13), (14000, 13)]
# The casing flexing under a bump. Each row: start in seconds, level in dB before the side gains,
# pitch in Hz, decay by 60 dB in seconds.
THUDS = [(6.605, -18, 56.8, 0.28), (6.664, -26, 58.7, 0.37), (7.598, -30.5, 55.4, 0.13)]
RASP_PEAK_DB, RASP_WIDTH_HZ = 3.5, 550   # the resonance on the rasp's pitch


def fingers():
    """Skin slides and bumps on the casing, which carries it to the right microphone."""
    rasp = friction(alike=0.29, slips_per_s=190, rough_db=1.5)
    narrow = rms_one(lowpass(rasp, RASP_WIDTH_HZ / 2))
    hiss, pressing, resonance = np.zeros(N), np.zeros(N), np.zeros((2, N))
    for peak, rise, fall, hiss_db, rasp_db, hz, glide in STROKES:
        motion = swell(peak, rise, fall)
        hiss += from_db(hiss_db) * motion
        pressing += from_db(rasp_db) * motion
        span = slice(int((peak - .5) * SR), int((peak + .5) * SR))
        octaves = glide * np.clip(TIME[span] - peak, -2 * rise, 2 * fall)
        carrier = np.sqrt(2) * np.sin(2 * np.pi * np.cumsum(hz * 2 ** octaves) / SR)
        # slow noise times a sine is a narrow band around the gliding pitch
        resonance[:, span] += from_db(rasp_db + RASP_PEAK_DB) * motion[span] * narrow[:, span] * carrier
    sliding = from_db(-3.5) * hiss * friction(alike=0.52, slips_per_s=770, rough_db=1.5)
    # the gap's resonances come and go as the finger shifts
    slide = colour(sliding, HISS_COLOUR) + resonate(sliding, FINGER_GAP, vary_db=4.5, changes_per_s=12)
    gap_cycles = np.cumsum(in_time(GAP_PITCH)[0]) / SR
    slide += from_db(-7.5) * hiss * narrow * np.sin(2 * np.pi * gap_cycles)
    slide += from_db(-10.5) * (colour(pressing * rasp, RASP_COLOUR) + resonance)
    knocks, skin = rings(THUDS, attack=0.0067), rng.standard_normal(N)
    for s, db, length, dull_hz in BUMPS:
        span, force = contact(s, length * 0.67, attack=0.00061, release=0.0056)
        bump = lowpass(colour(skin[span], BUMP_COLOUR), dull_hz)
        knocks[span] += from_db(db) * force * rms_one(bump)
    # side gains in dB: left, right
    return slide * from_db([[-10], [4.5]]) + knocks * from_db([[-42], [4.5]])


def room(x, wet_db, count=3):
    """Dense reflections, duller as they die; their pattern shifts as the microphones move."""
    low_t60_s, high_t60_s = 0.37, 0.13   # below and above 7 kHz
    t = TIME[:int(.6 * SR)]
    low = lowpass(rng.standard_normal((count, 2, len(t))), 7000)
    high = highpass(rng.standard_normal((count, 2, len(t))), 7000)
    tails = low * from_db(-60 * t / low_t60_s) + 0.6 * high * from_db(-60 * t / high_t60_s)
    tails = tails * (t > .005)   # reflections start after 5 ms
    echoes = signal.oaconvolve(x[None], rms_one(tails) / np.sqrt(len(t)), axes=-1)[..., :N]
    # wander between the tails at constant total power
    shares = np.array([drift(4) for _ in echoes])
    shares /= np.linalg.norm(shares, axis=0)
    return x + from_db(wet_db) * np.sum(shares[:, None] * echoes, axis=0)


def scene():
    """The mixer lies a little to the left, so its sound reaches that microphone first."""
    lag_s = .000125   # how much later the right microphone hears it
    mixer = room(shaft() + screech(), wet_db=-8.0) + room(lid() + motor(), wet_db=-10.5)
    mixer = mixer + clicks() + room(pings(), wet_db=-9.0)
    mixer[1] = np.interp(TIME - lag_s, TIME, mixer[1])
    return mixer + background() + sleeve() + fingers()


# The left port is bright, the right one dull. Each row: frequency in Hz,
# left minus right in dB before each side's share scales it.
PORTS = [(100, -2), (370, -5), (720, 1), (1300, -1), (2300, -6), (3100, -10.5), (4000, 1.5), (5700, -9.5),
         (7200, -1.5), (8500, 5.5), (11000, 22.5), (12500, 16.5), (14000, 8.5)]


def record(dry):
    """Each port colours the sound, peaks overload, bottom and top are cut."""
    def port(hz, share):
        return np.sqrt(2 / (1 + from_db(-share * at_hz(PORTS, hz)) ** 2))
    left = causal(dry[0], lambda hz: port(hz, 0.56))
    right = causal(dry[1], lambda hz: port(hz, -0.79))
    heard = highpass(np.array([left, right]), 38)
    top = signal.ellip(12, .1, 70, CUTOFF_HZ, fs=SR, output="sos")
    overloaded = 1.188 * np.tanh(signal.sosfilt(top, heard) / 1.128)
    return signal.sosfilt(top, overloaded)   # cut again what the overload added


dry = scene()
out = record(dry)
persist_wave(out)
```